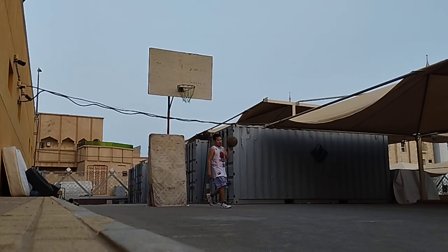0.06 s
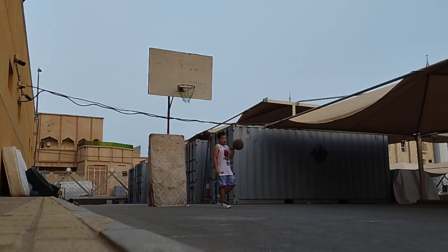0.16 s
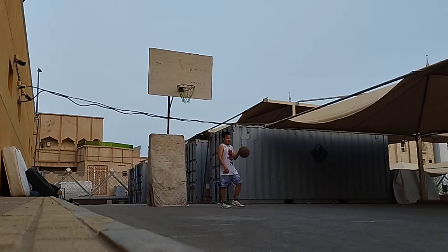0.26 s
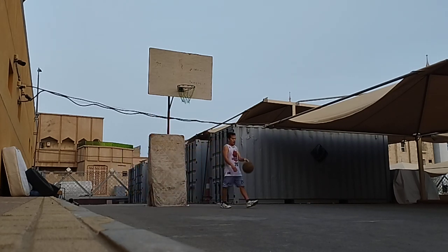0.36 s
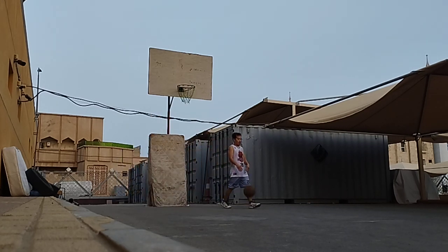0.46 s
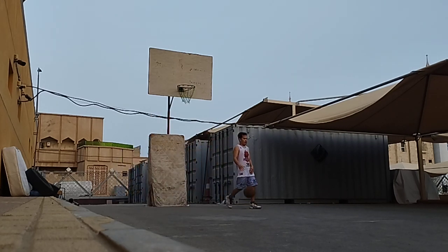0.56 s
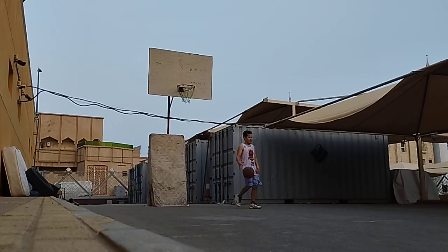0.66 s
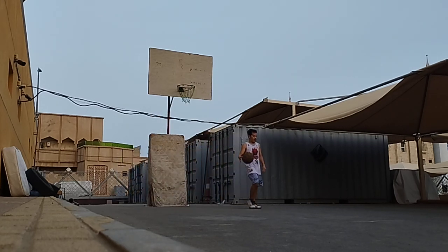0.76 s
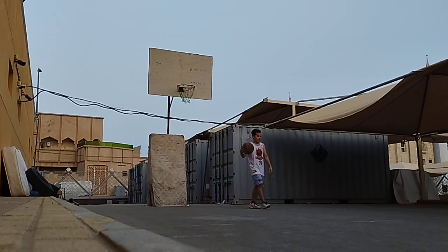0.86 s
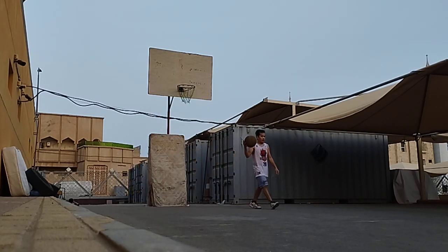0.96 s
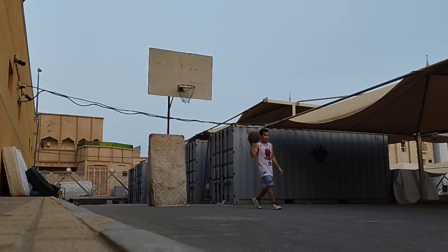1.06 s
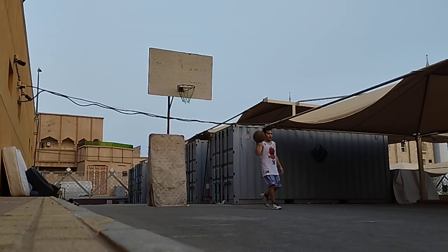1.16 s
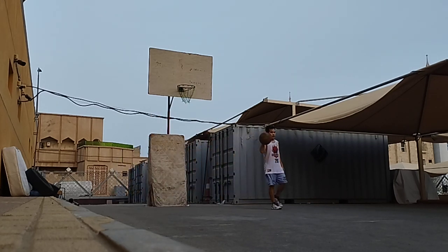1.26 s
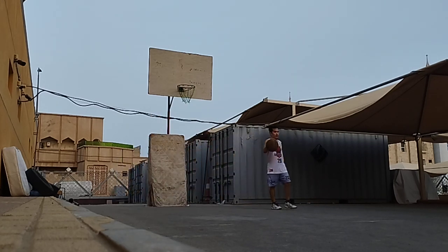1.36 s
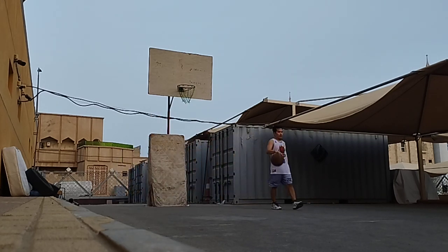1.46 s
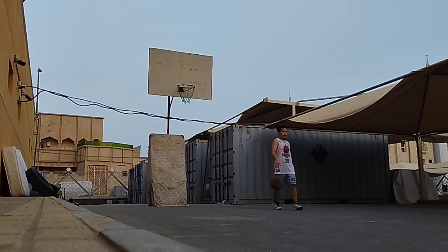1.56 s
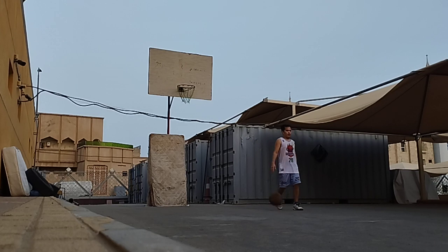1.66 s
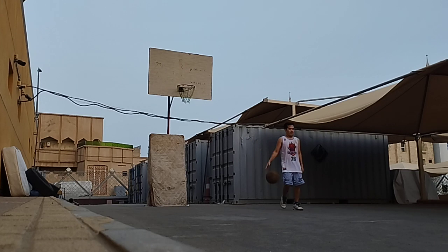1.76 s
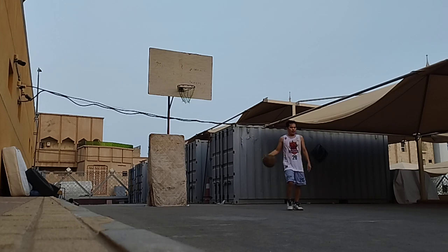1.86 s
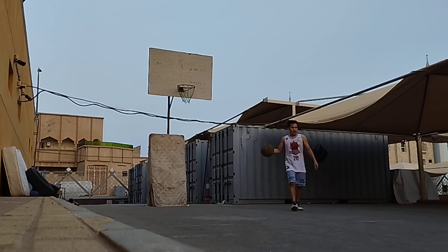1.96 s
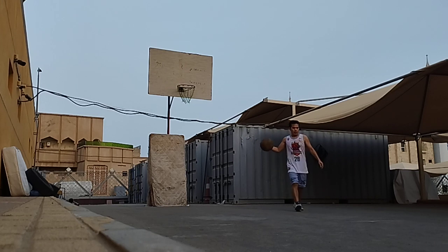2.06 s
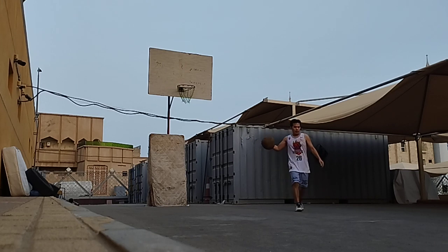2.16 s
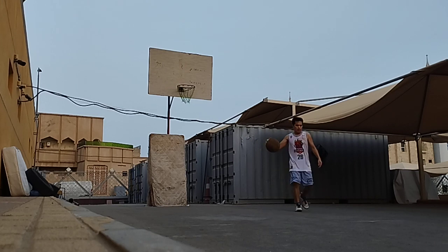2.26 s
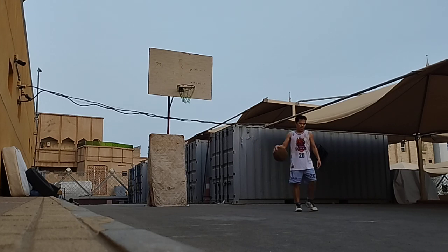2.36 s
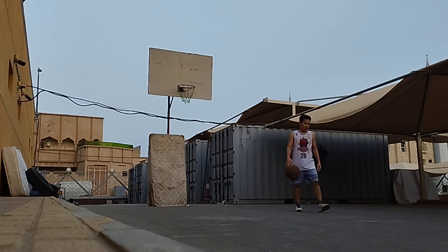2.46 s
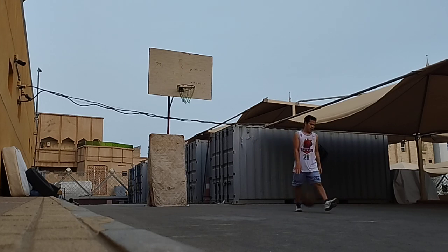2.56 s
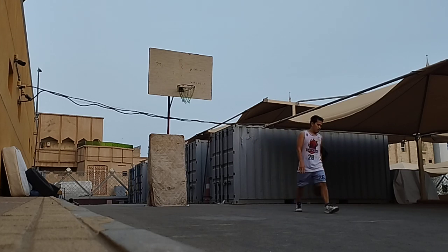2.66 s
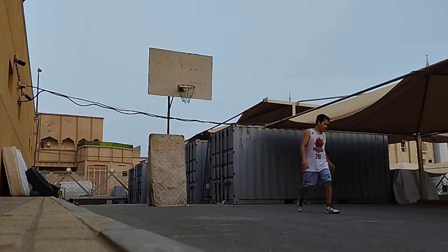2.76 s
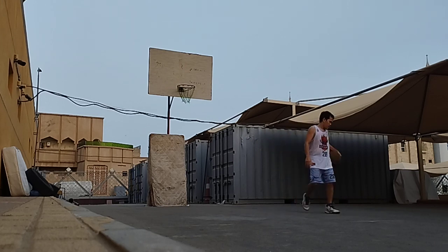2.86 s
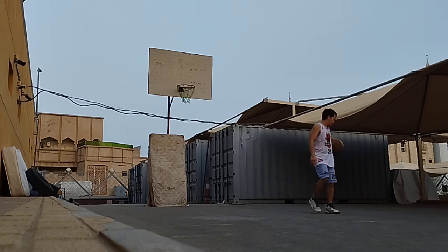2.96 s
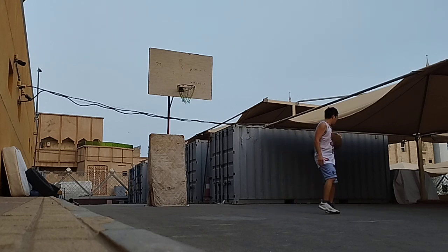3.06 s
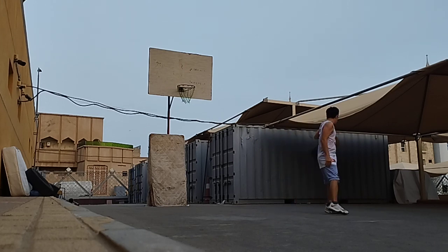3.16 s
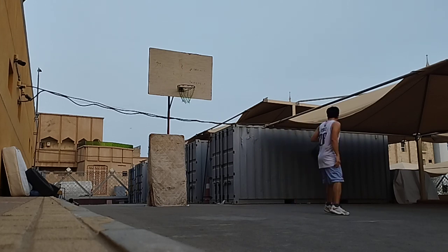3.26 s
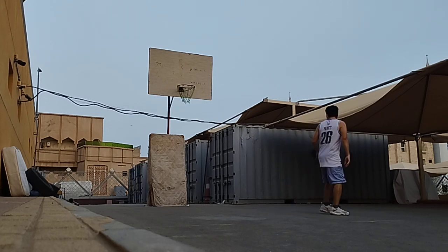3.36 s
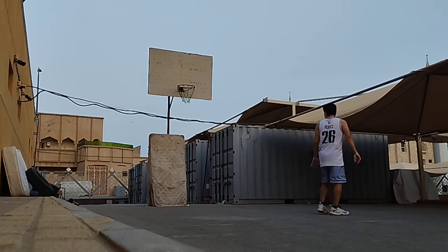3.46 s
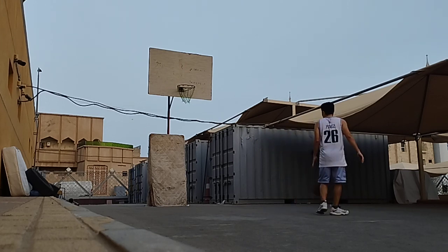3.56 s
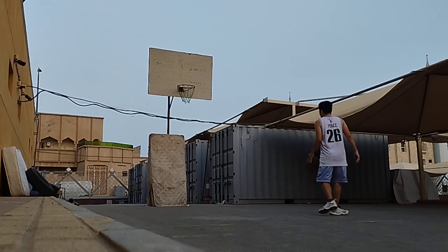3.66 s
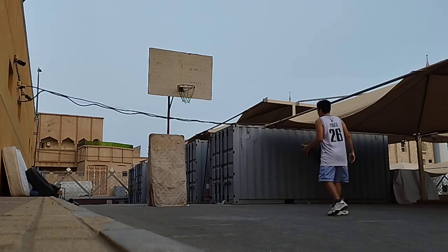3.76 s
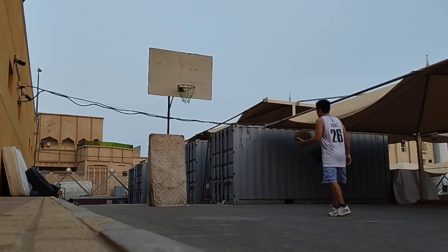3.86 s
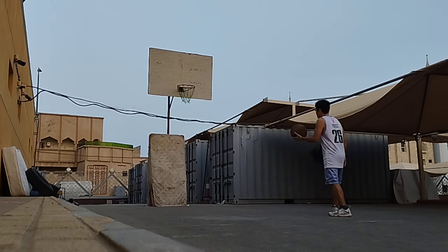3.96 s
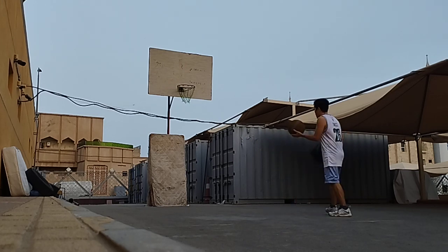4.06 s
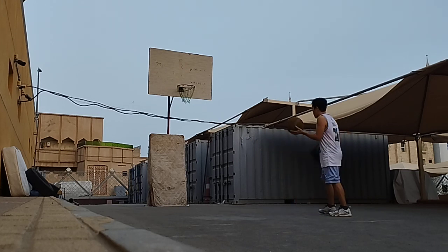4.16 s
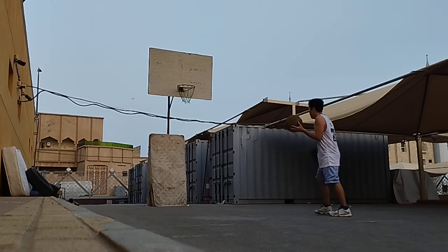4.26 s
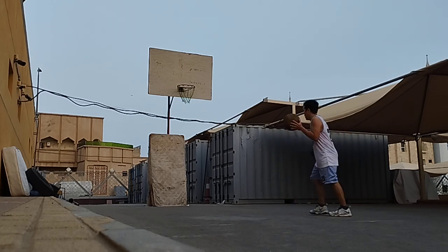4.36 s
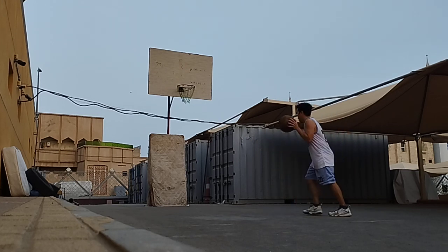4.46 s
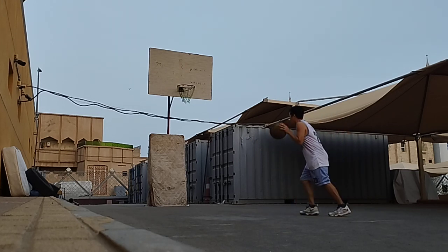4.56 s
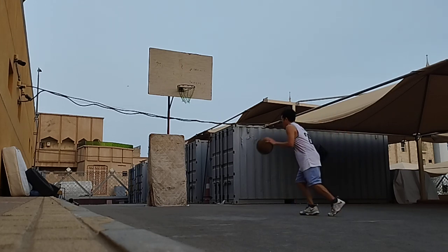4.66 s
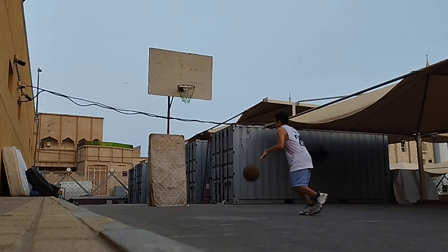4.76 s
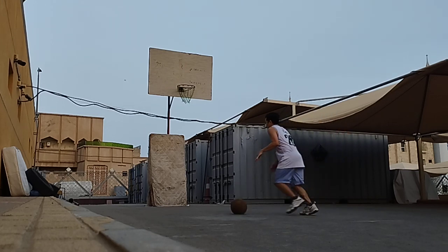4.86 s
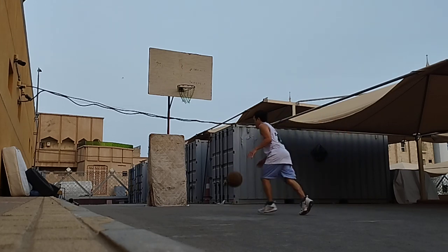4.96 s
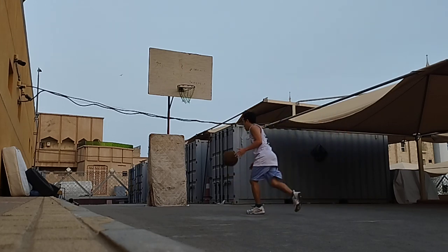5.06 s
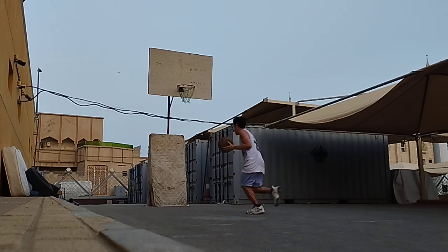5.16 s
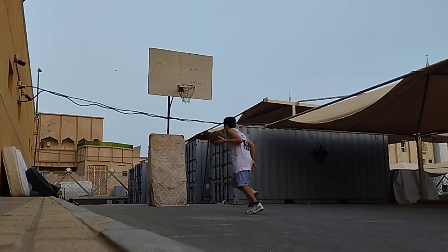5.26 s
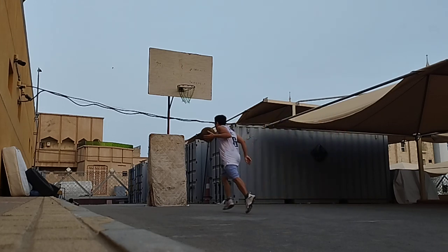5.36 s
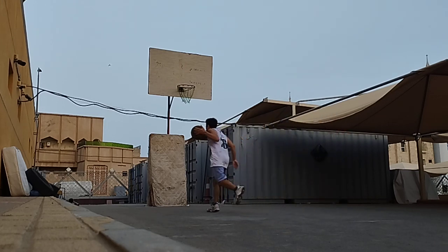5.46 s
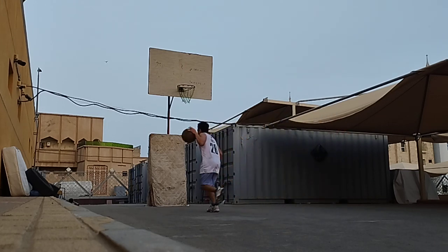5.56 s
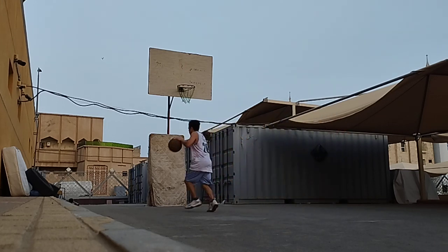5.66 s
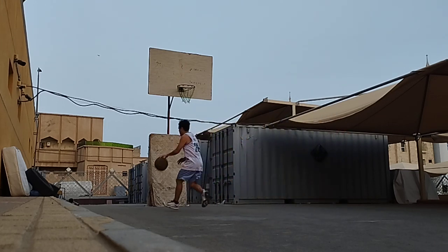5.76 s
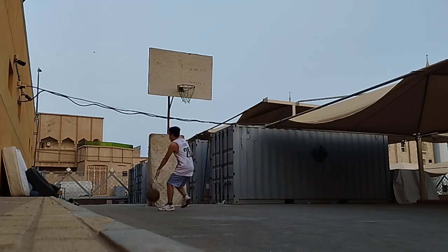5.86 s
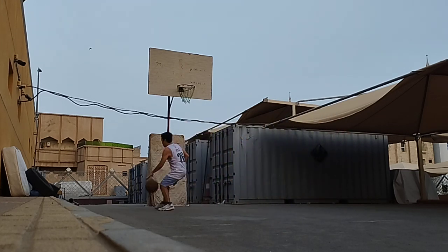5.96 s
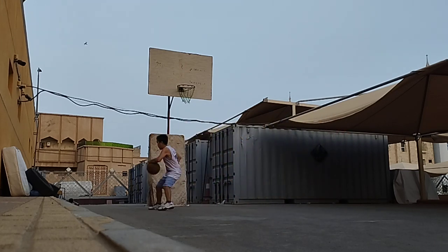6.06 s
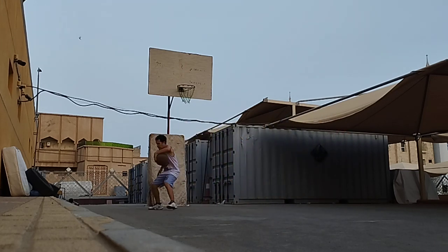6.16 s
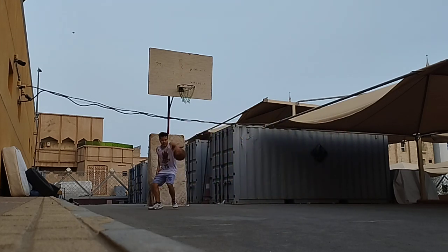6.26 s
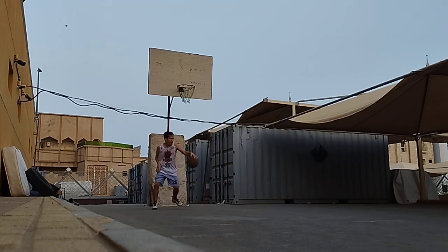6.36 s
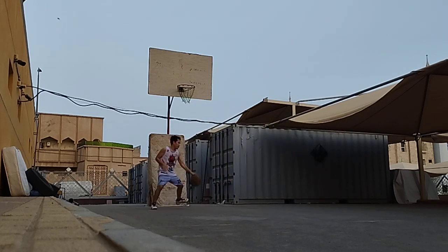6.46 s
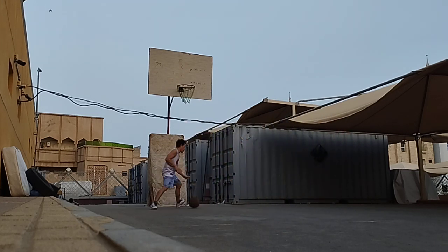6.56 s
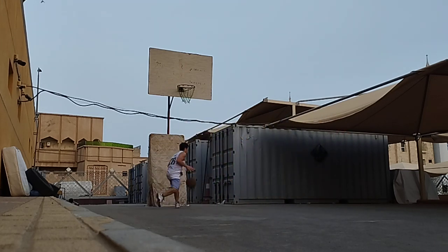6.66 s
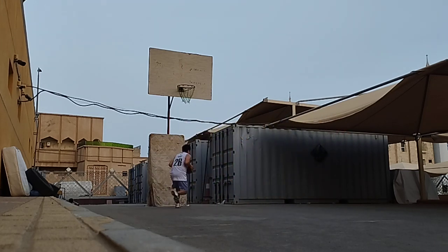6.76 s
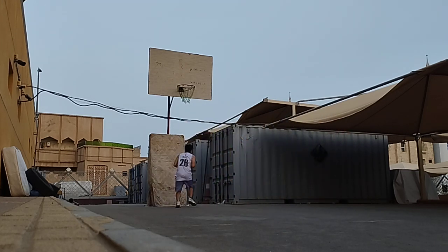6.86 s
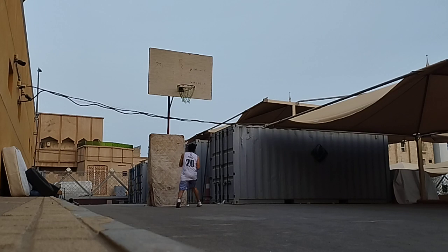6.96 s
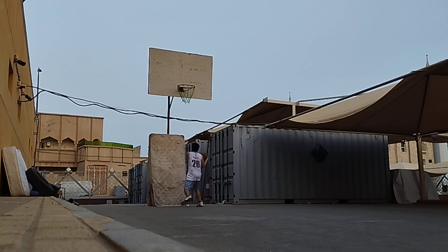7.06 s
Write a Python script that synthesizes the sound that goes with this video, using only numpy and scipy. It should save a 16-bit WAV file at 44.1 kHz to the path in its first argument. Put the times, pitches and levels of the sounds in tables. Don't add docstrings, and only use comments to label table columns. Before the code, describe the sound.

Low traffic rumble and a pulsing idling engine fill an outdoor yard. Grit ticks, a hand pats softly, then a basketball slaps the concrete with a round thump and short airy ring, answered by metal walls. A thin distant brake squeal accompanies this first of seven bounces. Shoes scrape from halfway on, and the last bounces sound brighter, then heavier and duller. The stereo microphone sits low, a few metres away.

```python
import sys
import numpy as np
from scipy import signal
from scipy.fft import rfft, irfft
from scipy.io import wavfile
from scipy.ndimage import uniform_filter1d, map_coordinates

SR = 44100
rng = np.random.default_rng(int(sys.argv[2]) if len(sys.argv) > 2 else 0)


def wav_out(sig):
    wavfile.write(sys.argv[1], SR, np.round(np.clip(np.atleast_2d(sig).T, -1, 1) * 32767).astype(np.int16))


def voltage_ratio(level):
    return 10 ** (np.asarray(level, float) / 20)


N = 313110


def unit(x):
    return x / np.sqrt(np.mean(x ** 2) + 1e-20)


def along(points, hz):
    f, v = np.transpose(points)
    return np.interp(np.log(hz + 1), np.log(f + 1), v)


def curves(rows):
    s, *cols = np.transpose(rows)
    return [np.interp(np.arange(N) / SR, s, c) for c in cols]


def wobble(rate):
    return map_coordinates(rng.standard_normal(int(N * rate / SR) + 4), [np.arange(N) * rate / SR])


def tone(hz):
    return np.sin(2 * np.pi * np.cumsum(hz) / SR)


def coloured(x, points):
    gain = voltage_ratio(along(points, np.fft.rfftfreq(4096, 1 / SR)))
    cep = irfft(np.log(np.maximum(gain, 1e-6)))
    cep = np.r_[cep[0], 2 * cep[1:2048], np.zeros(2048)]
    return signal.fftconvolve(x, irfft(np.exp(rfft(cep)))[None], axes=1)[:, :x.shape[1]]


def add(track, s, sound):
    part = track[:, round(s * SR):][:, :sound.shape[1]]
    part += sound[:, :part.shape[1]]


# frequency in Hz, likeness from -1 to 1.
LIKENESS = [(60, 0.97), (130, 0.9), (290, 0.76), (640, 0.3), (1410, -0.36), (3100, 0.25), (6820, -0.027),
            (15000, 0.26)]


def rush(spectrum, patchy_db):
    z = signal.stft(rng.standard_normal((2, N + 512)), nperseg=512)[2]
    field = uniform_filter1d(rng.standard_normal(z.shape[1:]), size=6, axis=0)
    field = uniform_filter1d(field, size=14, axis=1)
    pair = signal.istft(z * voltage_ratio(patchy_db * unit(field)), nperseg=512)[1][:, :N]
    hz = np.fft.rfftfreq(N, 1 / SR)
    turn = np.arccos(np.clip(along(LIKENESS, hz), -1, 1)) / 2
    mid, side = irfft(rfft(pair) * voltage_ratio(along(spectrum, hz)) * [np.cos(turn), np.sin(turn)], N)
    return unit(np.array([mid + side, mid - side]))


# time in seconds, level in dB.
TRAFFIC = [(0, -38.5), (.34, -42), (.75, -39), (1.2, -42), (1.92, -36.5), (2.25, -41.5), (3.4, -41),
           (4.6, -41.5), (4.95, -45), (5.2, -39), (5.61, -44), (6.1, -39), (7.1, -39.5)]
# time in seconds, firing rate in Hz, level in dB.
ENGINE_IDLE = [(0, 28.95, -39), (.9, 28.08, -40), (1.9, 29.98, -42), (2.4, 32.57, -33.5), (3.4, 32.59, -33),
               (4.1, 31.14, -37), (4.8, 31.3, -41), (5.2, 27.8, -35.5), (5.8, 28.56, -40),
               (6.3, 28.1, -34.5), (6.75, 28.65, -52), (7.1, 32.4, -35)]
# pitch in Hz, level in dB.
MACHINE_HUMS = [(71.5, -51), (115, -54)]
# frequency in Hz, level in dB per Hz.
RUMBLE_TONE = [(12, -15), (22, -12), (32, -11.5), (42, -4.5), (58, 4.5), (75, -0.5), (120, -5),
               (200, -12.5), (290, -57), (500, -120)]
# frequency in Hz, level in dB per Hz.
WASH_TONE = [(110, -16.5), (180, -9), (228, -2), (304, -7.5), (324, -8.5), (438, -9), (482, -9), (547, -13),
             (592, -13.5), (984, -18.5), (1980, -25.5), (2630, -34), (8000, -55.5), (10400, -68),
             (17600, -120)]
# frequency in Hz, level in dB.
HISS_TONE = [(2500, -20), (4500, 4), (6500, 2), (8500, -4), (10500, -3), (13000, 0), (15800, 3),
             (16100, -40), (17000, -90)]


def town():
    rumble_db, = curves(TRAFFIC)
    wash_db = -46.5 + 0.16 * (rumble_db - rumble_db.mean())
    firing_hz, engine_db = curves(ENGINE_IDLE)
    engine = voltage_ratio(engine_db + .5 + 2.5 * wobble(5)) * tone(firing_hz + .8 * wobble(6))
    engine = engine * (1 + 0.5 * tone(3 + .8 * wobble(1.543)))
    hums = sum(voltage_ratio(db + 3 * wobble(2.5)) * tone(hz + .6 * wobble(3)) for hz, db in MACHINE_HUMS)
    rumble = voltage_ratio(rumble_db + 1.5 * wobble(4.7)) * rush(RUMBLE_TONE, patchy_db=0.2)
    wash = voltage_ratio(wash_db + 0.16 * wobble(5.4)) * rush(WASH_TONE, patchy_db=0.84)
    hiss = voltage_ratio(-84) * rush(HISS_TONE, patchy_db=.3)
    return voltage_ratio([[.45], [-.45]]) * (engine + hums + rumble + wash) + hiss


# start in seconds, peak level in dB, level of the top band in dB.
STONES = [(0.0623, -54, -71), (1.5677, -53, -83), (1.6272, -40, -58), (2.1553, -69.5, -80),
          (3.3091, -55, -68), (3.4086, -51.5, -74), (3.937, -56, -69), (4.0717, -49.5, -66),
          (4.4705, -62, -77), (4.5025, -57, -70), (4.6625, -63, -67), (4.718, -56, -70), (4.971, -59, -80),
          (5.023, -59, -67), (5.5972, -49, -61), (5.7666, -46.5, -77), (6.1194, -63, -57),
          (6.848, -46, -63)]
# frequency in Hz, level in dB per Hz.
GRIT_TREBLE = [(6000, -63), (8500, -8.5), (11000, -13), (13500, -4), (15800, -11.5), (16300, -49)]


def ticks():
    yard, t = np.zeros((2, N)), np.arange(SR // 20) / SR
    middle = [(1200, -81), (4500, 3.5), (7200, -3), (12000, -81)]  # (Hz, dB)
    for s, db, top_db in STONES:
        click = rng.standard_normal((2, 2, len(t)))
        mid = voltage_ratio(db - 5 - 60 * t / 0.016) * unit(coloured(click[0], middle))
        top = voltage_ratio(top_db + 2.5 - 60 * t / 0.018) * unit(coloured(click[1], GRIT_TREBLE))
        add(yard, s, mid + top)
    return yard


# frequency in Hz, time to fall 60 dB in seconds.
YARD_DECAY = [(100, 0.086), (500, 1), (1500, 0.48), (4000, 0.63), (8000, 0.33), (15000, 0.46)]
# frequency in Hz, level in dB.
STEEL_TONE = [(80, -3), (300, -10), (1000, -2), (3000, 0.5), (7000, -3.5), (15000, 4.5)]


def walls(x):
    hz, t, z = signal.stft(rng.standard_normal((2, SR // 2)), SR, nperseg=256)
    tail_db = along(STEEL_TONE, hz)[:, None] - 60 * t / along(YARD_DECAY, hz)[:, None]
    tail = signal.istft(z * voltage_ratio(tail_db), SR, nperseg=256)[1]
    tail = tail * np.interp(np.arange(tail.shape[1]) / SR, [0, .03, .06], [.3, .4, 1])
    return signal.fftconvolve(x, tail / np.linalg.norm(tail[0]), axes=1)


# start in seconds, peak level in dB, pitch in Hz.
SOFT_PATS = [(.384, -44, 690), (1.91, -65, 4800), (2.155, -61, 4650), (3.411, -48.5, 2660),
             (3.657, -41, 1670), (3.787, -47, 1690), (4.287, -57, 685), (4.949, -52, 603),
             (5.959, -35, 584), (6.117, -41.5, 1930), (6.172, -48, 1800), (6.886, -39.5, 640),
             (6.887, -45.5, 1310)]


def pats():
    yard, t = np.zeros((2, N)), np.arange(SR // 10) / SR
    for s, db, hz in SOFT_PATS:
        puff = rng.standard_normal((2, len(t)))
        puff = puff[0] + .6 * puff
        puff = coloured(puff, [(hz / 4, -70), (hz / 1.2, 0), (hz * 1.2, 0), (hz * 4, -70)])
        swell = voltage_ratio(db - 60 * t / 0.035) * (1 - np.exp(-t / 0.001))
        add(yard, s, swell * (np.sin(2 * np.pi * hz * t) + .45 * unit(puff)))
    return yard


BRAKE_HZ = (9478, 12721)


def squeal():
    loudest_s, rise_s, fall_s = .64, 0.11, 0.33
    times = [loudest_s - rise_s, loudest_s, loudest_s + fall_s]
    away = np.interp(np.arange(N) / SR, times, [1, 0, 1])
    lines = sum(voltage_ratio(db - 14 * away + 5.4 * wobble(35)) * tone(hz + 12 * wobble(25))
                for hz, db in zip(BRAKE_HZ, (-80.5, -80)))
    return (away < 1) * lines


FREE_HZ = 1085
LEAVE_S = .0107


def squash(t, hz, sudden):
    swell = (1 - (1 - sudden) * np.exp(-(t / 0.0062) ** 2)) / (1 + (t / (1.2 * LEAVE_S)) ** 8.8)
    turns = hz * (t - LEAVE_S)
    stretch = 2 * hz * LEAVE_S - 1
    turns = np.where(turns < -.5, turns / stretch - .5 + .5 / stretch, turns)
    return -swell * np.cos(2 * np.pi * turns) * (1 - np.exp(-t / 0.00014))


# multiple of the main pitch, level in dB, time to fall 60 dB in seconds.
AIR_MODES = [(1, 6.5, 0.042), (1.24, -13, 0.09), (0.842, -27, 0.023), (1.56, -9.5, 0.041),
             (2.05, -21, 0.03), (2.48, -23, 0.061), (3.25, -16, 0.014)]


def air_ring(t, late, hz, again_db):
    pressed = np.cumsum(hz * (1 + 0.12 * np.exp(-t / 0.0011))) / SR
    grow, soft = 1 - .6 * np.exp(-t / .0015), 1 - np.exp(-late / .001)
    ring = 0
    for k, db, t60 in AIR_MODES:
        first = -grow * voltage_ratio(-60 * t / (.55 * t60)) * np.sin(2 * np.pi * k * pressed)
        again = soft * voltage_ratio(again_db + 2.5 - 60 * late / (0.65 * t60)) * np.sin(2 * np.pi * k * FREE_HZ * late)
        ring = ring + voltage_ratio(db + rng.normal(0, 1.0)) * (first + again)
    return ring


# pitch in Hz, level in dB, time to fall 60 dB in seconds.
FLIGHT_PING = [(990, -37, .4), (2180, -46, .4), (2850, -44, .9)]


def flight_ping(t, late):
    return sum(voltage_ratio(db + rng.normal(0, 2) - 60 * t / t60) * np.sin(2 * np.pi * hz * late)
               for hz, db, t60 in FLIGHT_PING)


def skin_ring(late):
    hz = 425 - 140 * np.exp(-late / 0.0039)
    return (1 - np.exp(-late / 0.0021)) * voltage_ratio(24.0 - 60 * late / 0.057) * tone(hz * (late > 0))


def contact_noise(t):
    burst = rng.standard_normal((2, len(t)))
    return burst[[0, 0]] + 1.32 * burst * [[0], [1]]


# frequency in Hz, level in dB.
KNOCK_TONE = [(150, -44), (300, -0.5), (700, 2), (1500, -12.5), (3000, -29), (6000, -28.5), (12000, -110)]


def knock(t, late):
    fade = voltage_ratio(-60 * t / 0.1) + (1 - np.exp(-late / 0.0015)) * voltage_ratio(-15.5 - 60 * late / 0.02)
    return voltage_ratio(5.5) * fade * unit(coloured(contact_noise(t), KNOCK_TONE))


def slap(t, late, tilt, peak_hz):
    burst = contact_noise(t)
    burst[:, 0] = -4
    rebound = (late > 0) * voltage_ratio(-29.5 - 60 * late / 0.012)
    burst = burst * (voltage_ratio(-60 * t / 0.013) + voltage_ratio(-35.0 - 60 * t / 0.12) + rebound)
    peak = [(peak_hz / 1.35, 0), (peak_hz, 3.5), (peak_hz * 1.35, 0)]  # (Hz, dB)
    burst = coloured(coloured(burst, tilt), peak)
    crack = voltage_ratio(-11 - 60 * t / .014) * np.sin(2 * np.pi * peak_hz * t)
    return voltage_ratio(10.0) * (burst / np.abs(burst).max() + crack)


# frequency in Hz, left minus right in dB.
BALL_SIDE = [(60, 1), (250, 3.5), (700, 2), (1300, 5), (2400, 4.5), (4400, -3.5), (8000, 4), (15000, 19)]


def at_camera(x, lag):
    left = coloured(x[:1], [(hz, db / 2) for hz, db in BALL_SIDE])
    right = coloured(x[1:], [(hz, -db / 2) for hz, db in BALL_SIDE])
    return np.vstack([np.pad(left, [(0, 0), (4 + lag, 4 - lag)]), np.pad(right, [(0, 0), (4, 4)])])


def container(x):
    t = np.arange(SR // 10) / SR
    ribs = rng.standard_normal((2, len(t))) * (1 - np.exp(-t / 0.0027)) * voltage_ratio(-60 * t / 0.071)
    ribs = coloured(ribs, STEEL_TONE)
    return signal.fftconvolve(x, ribs / np.linalg.norm(ribs[0]), axes=1)


# strength in dB, suddenness from 0 to 1, crispness in dB,
# slope of the slap in dB an octave, air ring of the pressed ball in Hz.
STRIKES = [
    (-25.5, 0.84, -6, -1.5, 947),
    (-26.5, 0.79, 3.5, -3.5, 870),
    (-28, 0.76, -2.7, -4.5, 1086),
    (-27.5, 0.97, -5.5, 1.5, 1055),
    (-25, 0.56, 0, 1, 894),
    (-22.5, 0.13, 0, -1.5, 894),
    (-25, 0, -7, 0.2, 1120),
]
# start in seconds, container echo delay in seconds,
# far house echo delay in seconds, lag of the left port in samples, brightest band of the slap in Hz.
LANDINGS = [
    (.6384, .045, .125, 2, 2100),
    (1.7635, .028, .124, 3, 1930),
    (2.7111, .036, .123, 4, 2300),
    (3.6145, .036, .122, 4, 2040),
    (4.9827, .04, .115, 3, 4900),
    (6.0182, .04, .102, -3, 3450),
    (6.686, .032, .2, -2, 2930),
]
# frequency in Hz, level in dB.
SLAP_TONE = [(800, -5.5), (1800, 0), (3500, -9.5), (5500, -8.5), (7200, -15.5), (8500, -28), (11000, -31.5),
             (14500, -30.5), (16000, -45), (16600, -56)]


def ball():
    court, t = np.zeros((2, N)), np.arange(SR // 2) / SR
    late = np.maximum(t - LEAVE_S - .0012, 0)
    house = [(80, -5.5), (200, 7.5), (1000, -8), (6000, -17)]
    for strike, landing in zip(STRIKES, LANDINGS):
        thump_db, sudden, crisp_db, bright_db, air_hz = strike
        s, near_s, far_s, lag, peak_hz = landing
        sudden = np.clip(sudden, 0, 1)
        flat = np.log2(FREE_HZ / air_hz)
        squash_hz = 89.2 + 42 * (1 - sudden)
        again_db = -10 + 19.5 * flat
        knock_db = thump_db - 10 - 0.49 * crisp_db
        air_db = thump_db - 4.5 + 0.16 * crisp_db
        skin_db = thump_db - 25 + 14 * sudden - 27 * flat

        thump = voltage_ratio(thump_db + 15.5) * squash(t, squash_hz, sudden)
        air = air_ring(t, np.maximum(t - LEAVE_S + 0.00026, 0), air_hz, again_db)
        ring = voltage_ratio(air_db + 6.5) * (air + flight_ping(t, late))
        body = thump + ring + voltage_ratio(skin_db) * skin_ring(late) + voltage_ratio(knock_db) * knock(t, late)
        tilt = [(hz, db + bright_db * np.log2(min(hz, 8000) / 4000)) for hz, db in SLAP_TONE]
        smack = voltage_ratio(thump_db + crisp_db) * slap(t, late, tilt, peak_hz)

        direct = at_camera(body + smack, lag)
        add(court, s - 4 / SR, direct)
        add(court, s + far_s, voltage_ratio(-22) * coloured(direct[::-1], house))
        spread = coloured(np.array([t == 0] * 2, float), tilt)
        spread = spread * np.linalg.norm(smack) / np.linalg.norm(spread)
        spread = (body - .2 * ring + spread)[:, :SR // 10]
        add(court, s + near_s, voltage_ratio(-12) * container(spread))
        add(court, s, voltage_ratio(-10.5) * walls(spread))
    return court


# start in seconds, peak level in dB, brightness in dB, length in seconds.
SHOE_SCUFFS = [(3.346, -54.5, -13, 0.04), (3.381, -50, -22, 0.029), (3.406, -47, -20, 0.033),
               (3.437, -53.5, -19, .049), (3.865, -55.5, -13, .04), (3.97, -58, -14, 0.14),
               (4.6394, -55.5, -15, 0.039), (5.154, -47.5, -17, 0.028), (5.2704, -56, -13, 0.032),
               (5.409, -54.5, -31.5, .032), (5.566, -36.5, -18.5, 0.033), (5.73, -55.5, -19.5, .044),
               (5.7635, -62, -8, 0.046), (5.93, -52.5, -9.5, 0.025), (6.136, -54.5, -14, 0.11),
               (6.3877, -53.5, -10, .031), (6.495, -41.5, -16, 0.047), (6.646, -56.5, -11, .045),
               (6.698, -49.5, -16, .036), (6.731, -50.5, -6.5, 0.034), (6.7694, -54, -26, 0.048),
               (6.803, -51, -29, 0.038), (6.886, -57, -13, 0.042), (7.0817, -41, -13, 0.044)]
# frequency in Hz, level in dB per Hz.
GRIT_BODY = [(500, -6), (1500, 4), (3000, 2), (5500, -1.5), (7300, -6.5), (8200, -33), (11000, -33),
             (16000, -83)]


def shoes():
    yard = np.zeros((2, N))
    for s, db, bright_db, length in SHOE_SCUFFS:
        u = np.arange(6000) / SR / length
        stroke = np.interp(u, [0, .15, 1, 1.35], [0.28, 0.96, 0.26, 0])
        clumps = voltage_ratio(3.5 * unit(uniform_filter1d(rng.standard_normal(6000), size=60)))
        sizes = voltage_ratio(4.8 * rng.standard_normal(6000))
        grains = rng.standard_normal((2, 2, 6000)) * sizes * clumps
        drag = voltage_ratio(db - 5.5) * unit(coloured(grains[0], GRIT_BODY))
        hiss = voltage_ratio(db + bright_db - 4.5) * unit(coloured(grains[1], GRIT_TREBLE))
        add(yard, s, stroke * (drag + hiss))
    return yard


def scene():
    feet = shoes() + ticks() + pats()
    return town() + squeal() + ball() + feet + voltage_ratio(-12.5) * walls(feet)[:, :N]


def top_cut(x):
    return signal.sosfilt(signal.butter(12, 16200, fs=SR, output="sos"), x)


def record(dry):
    top_hz = 15900
    keep = np.interp(np.fft.rfftfreq(N, 1 / SR), [top_hz, 1.02 * top_hz], [1, .02])
    mix = irfft(rfft(dry) * keep, N)
    return top_cut(mix)


dry = scene()
out = record(dry)
wav_out(out)
```